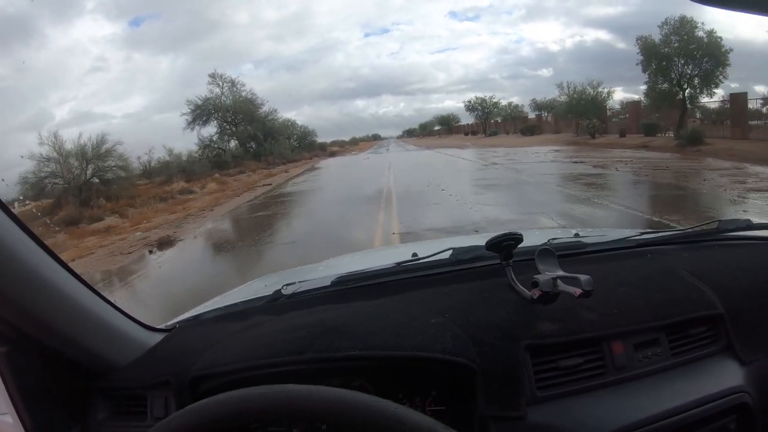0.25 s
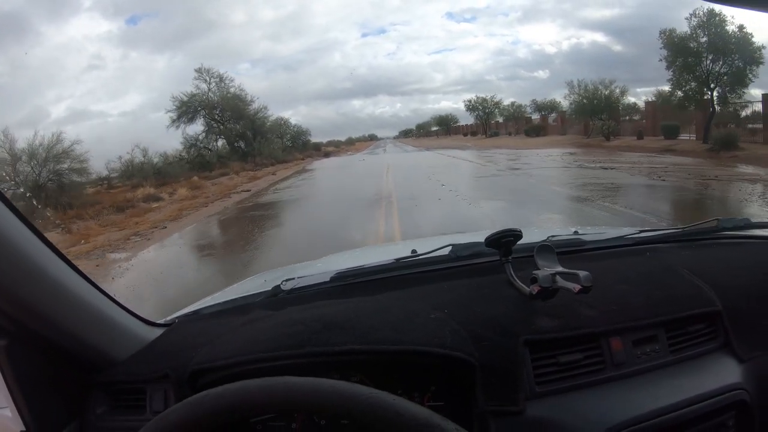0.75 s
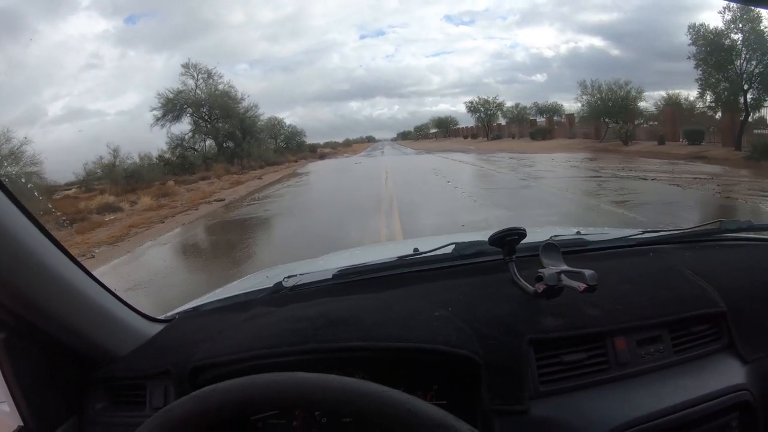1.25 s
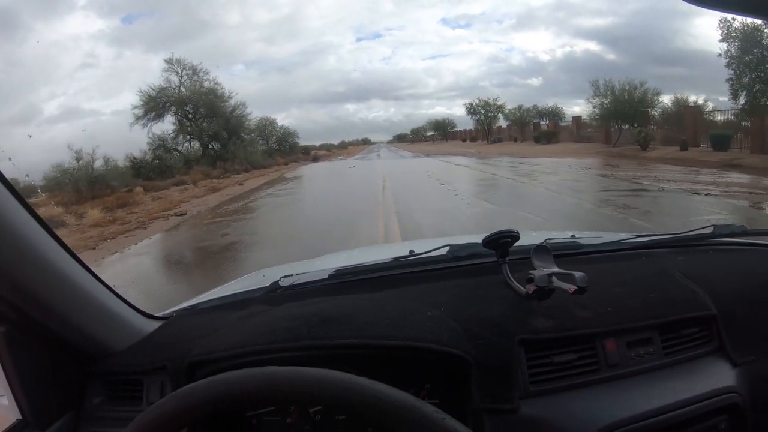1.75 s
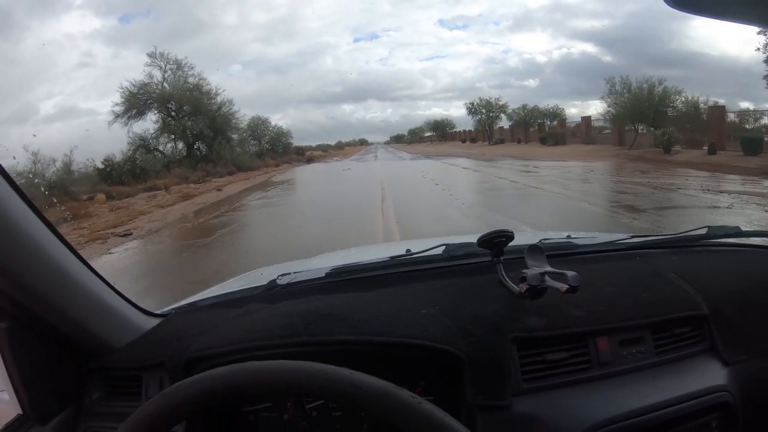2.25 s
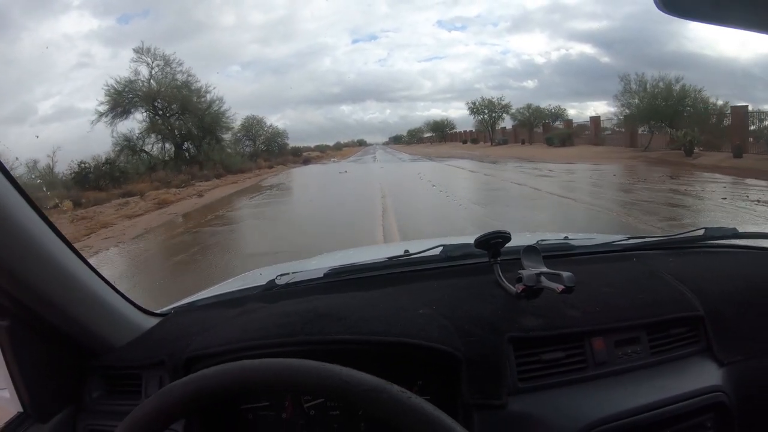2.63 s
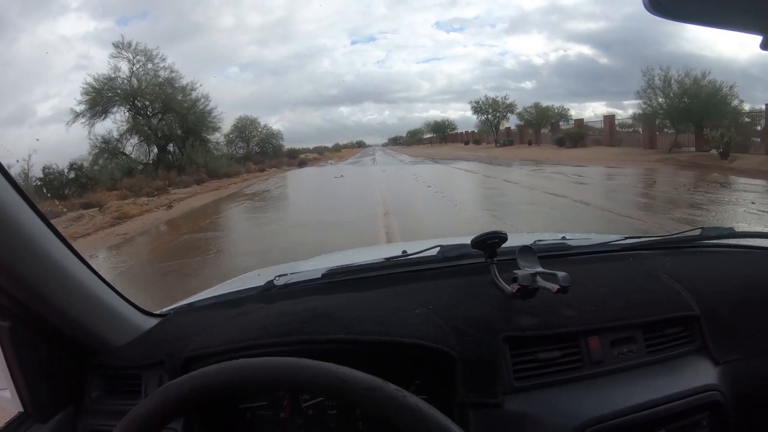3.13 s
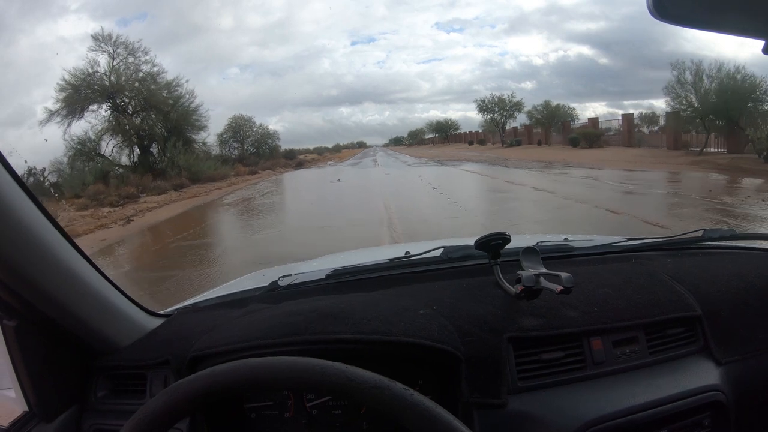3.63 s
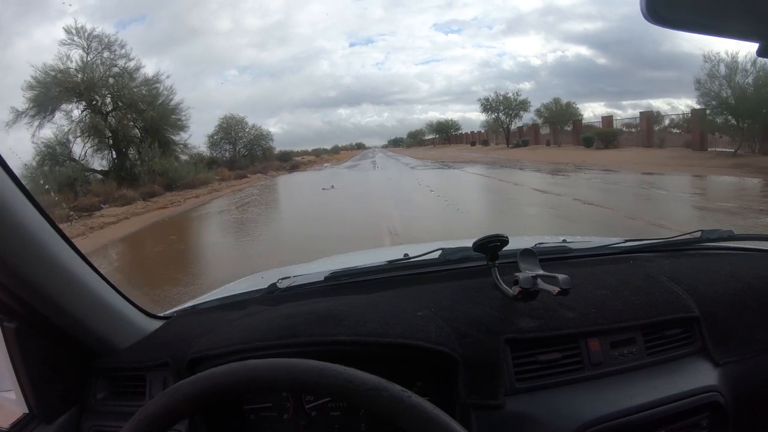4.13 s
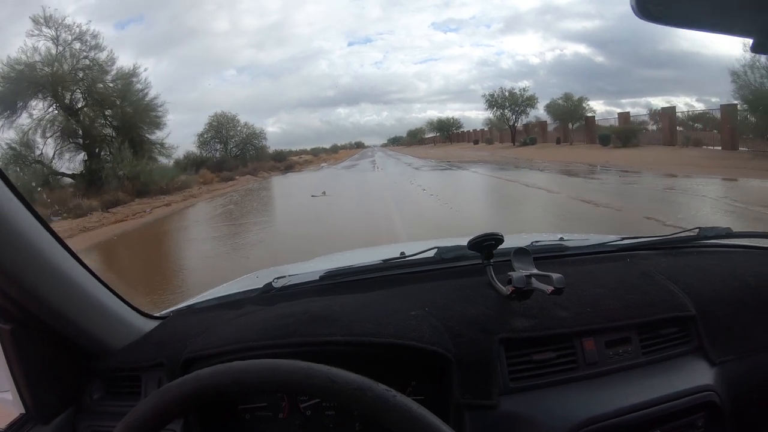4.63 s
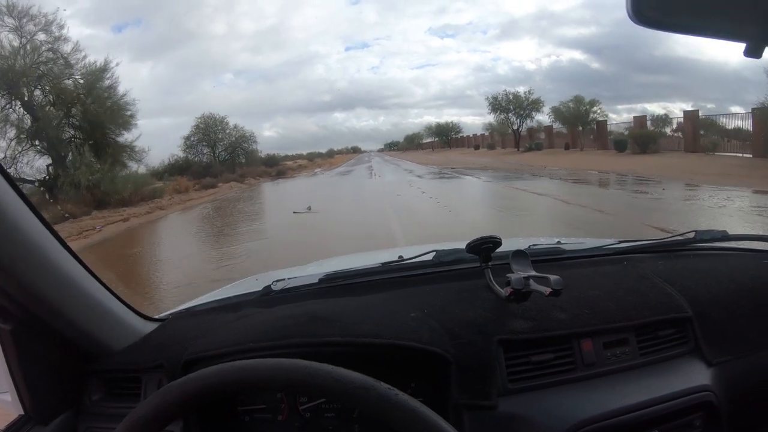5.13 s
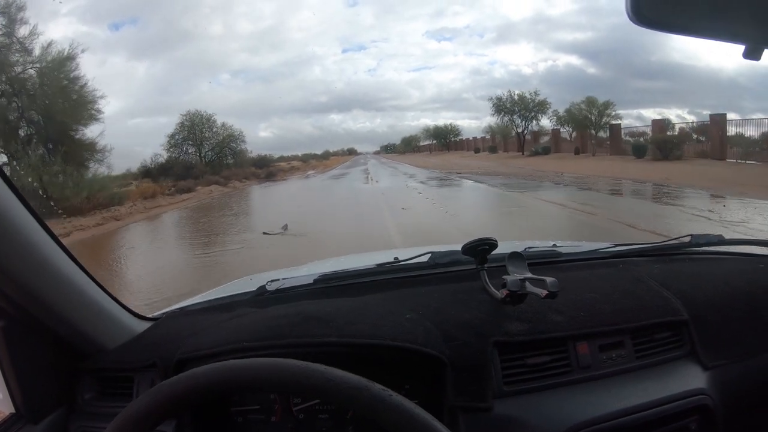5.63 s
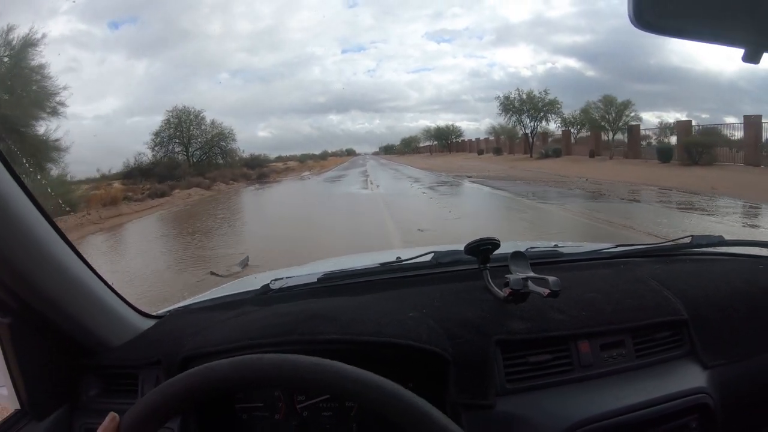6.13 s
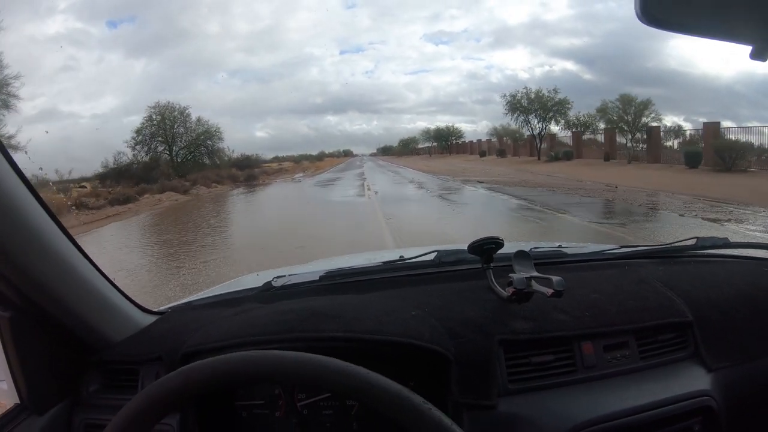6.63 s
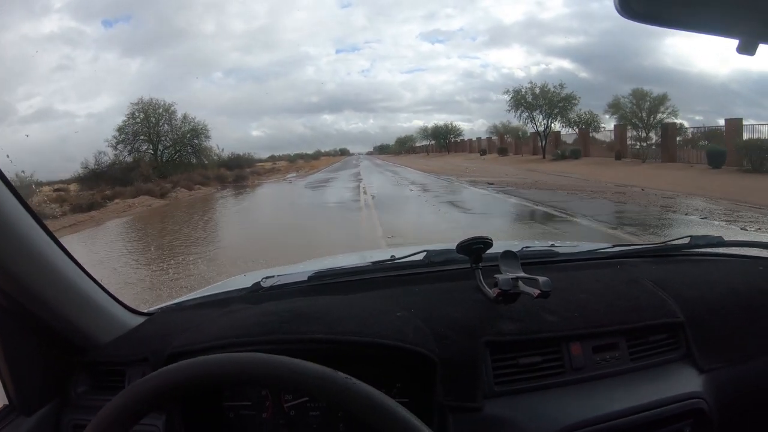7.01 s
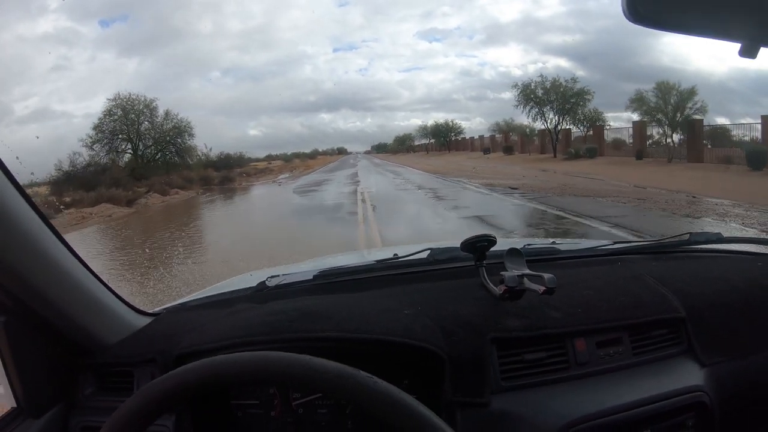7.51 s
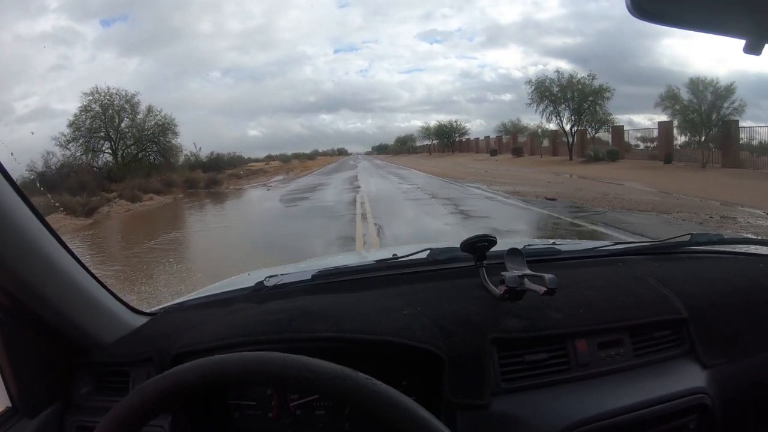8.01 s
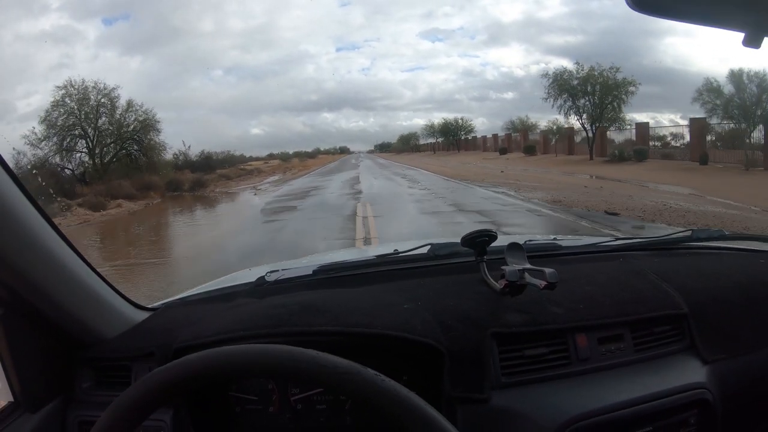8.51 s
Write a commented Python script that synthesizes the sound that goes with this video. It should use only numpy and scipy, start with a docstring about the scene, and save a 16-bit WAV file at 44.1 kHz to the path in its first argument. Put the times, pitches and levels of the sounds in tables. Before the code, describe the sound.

Heard inside a car cabin, a very low engine note and bassy road rumble dominate. Brakes rub faintly at first, and a soft double bump knocks the body. The engine pitch then rises as the car pulls on. Wet tyre hiss gradually builds into patchy spray, with water slapping the wheel arches and drops ticking on bodywork. Stereo microphone in the cabin, bass nearly centred, water wider.

```python
"""An engine's firing note booms in the cabin as a car rolls slowly into water lying over a road.
The note is a sine with a weak overtone, following a table of rate and level; a driveline hum joins it.
Road noise shakes the cabin's low modes, and the brakes rub at first as noise through narrow resonances.
Then wheel spray rises: patchy, grainy noise, with gouts slapping the arches and drops ticking as damped notes.
Two microphone ports hear it all through a frequency-dependent stereo mix."""
import sys
import numpy as np
from scipy import signal
from scipy.fft import rfft, irfft, next_fast_len
from scipy.io import wavfile
from scipy.ndimage import uniform_filter1d, minimum_filter1d, map_coordinates

SR = 44100
rng = np.random.default_rng(int(sys.argv[2]) if len(sys.argv) > 2 else 0)


def pcm_store(signal):
    """Save signal as 16-bit PCM."""
    levels = np.round(np.clip(np.atleast_2d(signal), -1, 1) * 32767)
    wavfile.write(sys.argv[1], SR, levels.astype(np.int16).T)


N = 385875


def amp(db):
    """Decibels to amplitude."""
    return 10 ** (np.asarray(db) / 20)


def unit(x):
    """Scale to rms 1."""
    return x / np.sqrt(np.mean(x ** 2) + 1e-20)


def along(points, hz):
    """(Hz, value) points interpolated on a log frequency axis."""
    point_hz, value = np.transpose(points)
    return np.interp(np.log(hz + 1), np.log(point_hz + 1), value)


def curves(rows):
    """One value per sample for each column after the time."""
    time_s, *columns = np.transpose(rows)
    return [np.interp(np.arange(N) / SR, time_s, column) for column in columns]


def wobble(knots_per_s):
    """Smooth random curve: cubic spline through normal knots."""
    at = np.arange(0, N + 64, 64)
    knots = rng.standard_normal(int(N * knots_per_s / SR) + 4)
    return np.interp(np.arange(N), at, map_coordinates(knots, [at * knots_per_s / SR]))


def filtered(x, response):
    """x times a complex response of frequency."""
    size = next_fast_len(N + SR // 2)
    return irfft(rfft(x, size) * response(np.fft.rfftfreq(size, 1 / SR)), size)[..., :N]


def ringing(modes):
    """Two unrelated noises through the same resonances, rms 1."""
    def response(f):
        power = 0
        for hz, width_hz, db in modes:
            detune = (f * f - hz * hz) / (f * width_hz + 1e-9)
            power = power + amp(2 * db) / (1 + detune ** 2) ** 2
        return np.sqrt(power)
    return unit(filtered(rng.standard_normal((2, N)), response))


def humming(modes, waver_db, base_hz=0):
    """Modes sounding without pause, pitch and strength drifting a little; rms 1."""
    total = np.zeros(N)
    for hz, wander_hz, db in modes:
        phase = 2 * np.pi * np.cumsum(base_hz + hz + wander_hz * wobble(10)) / SR
        total += amp(db + waver_db * wobble(7)) * np.sin(phase + rng.uniform(0, 2 * np.pi))
    return unit(total)


def rush(spectrum, patchy_db, grains=0):
    """Two unrelated noises sharing time-frequency patches of random gain, over optional grains; rms 1."""
    z = signal.stft(rng.standard_normal((2, N)), nperseg=256)[2]
    patches = rng.standard_normal(z.shape[1:])
    patches = uniform_filter1d(patches, size=6, axis=0)  # bins
    patches = uniform_filter1d(patches, size=7, axis=1)  # frames
    pair = signal.istft(z * amp(patchy_db * unit(patches)), nperseg=256)[1][:, :N]
    return unit(filtered(unit(pair) + grains, lambda hz: amp(along(spectrum, hz))))


def patter(rate_per_s, spread_db):
    """Droplets as random impulses of very uneven size, rms 1."""
    hit = rng.random((2, N)) < rate_per_s / SR
    size_db = spread_db * np.minimum(rng.exponential(size=(2, N)), 4)
    return unit(hit * rng.choice([-1, 1], (2, N)) * amp(size_db))


def ring(t, hz, t60_s, rise_s):
    """Damped sine with a soft start."""
    return amp(-60 * t / t60_s) * (1 - np.exp(-t / rise_s)) * np.sin(2 * np.pi * hz * t)


# road coarseness: (time [s], rumble level [dB], body shell level [dB])
COARSE = [(0, -26, -37.5), (.7, -29, -37.5), (1.2, -22.5, -37.5), (1.7, -28.5, -39), (2.7, -26.5, -38.5),
          (3.5, -31.5, -38.5), (4.5, -30, -38), (5.4, -30.5, -39), (6.2, -26.5, -37.5), (7, -27.5, -38),
          (8.3, -27, -37.5), (8.55, -29, -39), (8.75, -33, -36.5)]
# noise spectra: (frequency [Hz], relative level [dB per Hz])
RUMBLE = [(8, -37), (16, -13), (22, -7), (30, -11), (40, 0), (62, -7), (85, -14.5), (100, -14.5),
          (125, -15.5), (150, -17.5), (190, -30.5), (400, -120)]
BODY = [(88, -40), (150, 0), (161, -4), (199, -1), (237, -3.5), (289, -8.5), (307, -11.5), (340, -15),
        (372, -15), (455, -20), (700, -28), (910, -70), (1540, -120)]
# cabin air modes: (frequency [Hz], wander [Hz], relative level [dB])
BOOM = [(41, 2.27, -6), (50.6, 2.415, 0), (59.53, 2.4, -8), (72.23, 2.406, -6), (80.63, 2.386, -9.5)]
# floor pan modes: (frequency above the lowest [Hz], wander [Hz], relative level [dB])
DRONE = [(0, 1.2, -0.5), (8, 2.2, -5), (17, 2.2, -6)]
# lowest floor pan mode, shifting with the load on it: (time [s], pitch [Hz])
PAN = [(0, 118), (.9, 121), (1.9, 119), (2.2, 112.5), (2.7, 115), (3.2, 118), (3.8, 116), (4.4, 120),
       (5.1, 113.5), (5.6, 119.5), (6.3, 116), (6.9, 113), (7.5, 118), (8.3, 123), (8.75, 120)]
# drone swells over ridges: (time of the top [s], gain [dB])
SWELLS = [(0.549, 4.5), (2.3, 3), (3.198, 8), (3.78, 4), (4.03, 3.5), (4.43, 7.5), (5.6, 8), (6.0, 2.5),
          (6.58, 5.5), (6.97, 3), (7.99, 6)]
SWELL_SIGMA_S = 0.068
BOOM_OVER_RUMBLE_DB, DRONE_BASE_DB, DRONE_WAVER_DB = 3.5, -33, 1


def road():
    """Road texture shakes the cabin air, the floor pan and the body shell."""
    coarse_db, body_db = curves(COARSE)
    pan_hz, = curves(PAN)
    t = np.arange(N) / SR
    drone_db = DRONE_BASE_DB + DRONE_WAVER_DB * wobble(8)
    for top_s, gain_db in SWELLS:
        drone_db += gain_db * np.exp(-((t - top_s) / SWELL_SIGMA_S) ** 2 / 2)
    shake = amp(coarse_db) * rush(RUMBLE, patchy_db=0.05)
    shake += amp(body_db + 0.91 * wobble(7)) * rush(BODY, patchy_db=0.2)
    boom_db = coarse_db + BOOM_OVER_RUMBLE_DB + 0.73 * wobble(5.1)
    shake[0] += amp(boom_db) * humming(BOOM, waver_db=3)
    shake[0] += amp(drone_db) * humming(DRONE, waver_db=2.6, base_hz=pan_hz)
    return shake


# pads rubbing: (time [s], low ring level [dB], high ring level [dB], scrape level [dB])
BRAKES = [(.15, -83, -76, -80), (.35, -56, -63, -63), (.7, -56, -59, -64), (.9, -53, -58, -56.5),
          (1.2, -54, -59, -63), (1.6, -56, -63, -67), (1.85, -55, -60, -67), (2.02, -51.5, -60, -62),
          (2.15, -52, -58, -61), (2.25, -58, -54, -62), (2.55, -54, -57, -65), (2.9, -59, -56.5, -64),
          (3.3, -59, -58.5, -66), (3.45, -55, -57, -64), (3.65, -70, -82, -58), (3.9, -81, -88, -65.5)]
# resonances: (frequency [Hz], width [Hz], relative level [dB])
LOW_RING = [(1390, 120, -2), (1513, 180, -5), (1895, 130, 0), (2040, 200, -8)]
HIGH_RING = [(2675, 120, 0), (2790, 120, -1), (4250, 250, -13)]
SCRAPE = [(3080, 320, 0), (3450, 250, -6)]


def brakes():
    """Pads drag unevenly on wet discs and excite their rings and a broader scrape, each in its own fits."""
    drag_db = 1.3 * wobble(18)
    rub = np.zeros((2, N))
    for level_db, modes in zip(curves(BRAKES), [LOW_RING, HIGH_RING, SCRAPE]):
        fits_db = drag_db + 1.2 * wobble(12)
        rub += amp(level_db + fits_db) * ringing(modes)
    return rub


# a wheel drops over a joint and rebounds: (time [s], level [dB])
BUMP = [(1.1626, -21), (1.176, -31)]
# shell modes: (frequency [Hz], relative level [dB], t60 [s])
KNOCK = [(195, 5, 0.17), (262, -3.5, 0.12), (330, -4, 0.085), (445, -15, 0.06), (550, -6.5, 0.055),
         (655, -4.5, 0.055), (875, -12.5, 0.033), (1870, -19, 0.11)]


def bump():
    """Each blow rings the body shell's damped modes."""
    out, t = np.zeros(N + SR), np.arange(SR // 4) / SR
    knock = sum(amp(db) * ring(t, hz, t60_s, rise_s=0.0022) for hz, db, t60_s in KNOCK)
    for time_s, level_db in BUMP:
        out[round(time_s * SR):][:len(t)] += amp(level_db) * knock
    return out[:N]


# tyre hiss on wet asphalt: (time [s], level [dB])
TYRES = [(0, -53), (.4, -52.5), (1.1, -50.5), (2.02, -50), (2.36, -51.5), (3.75, -49), (5.97, -48.5),
         (6.16, -46), (7.5, -43.5), (8.75, -49)]
# slosh in the arches: (time [s], level [dB])
SLOSHING = [(0.0, -45), (0.02, -59.5), (0.36, -55), (0.88, -54), (0.92, -52), (1.34, -56), (1.95, -56.5),
            (2.26, -52), (2.61, -52.5), (3.78, -53), (4.0, -55.5), (4.36, -52.5), (4.41, -54),
            (4.53, -48.5), (4.8, -51.5), (4.9, -46.5), (4.95, -51.5), (5.09, -45), (5.46, -47.5),
            (5.97, -43.5), (6.09, -41), (6.38, -42), (7.41, -40.5), (7.8, -41), (7.82, -38.5),
            (8.75, -43.5)]
# spray thrown up by the wheels: (time [s], level [dB])
WATER = [(0, -68.5), (.3, -69), (1.0, -63), (1.41, -65), (1.9, -66.5), (2.39, -64), (3.46, -64),
         (3.65, -59.5), (3.95, -63), (4.29, -61), (4.63, -56.5), (4.95, -56.5), (5.21, -52), (5.65, -54),
         (6.16, -48.5), (6.43, -49.5), (7.6, -46), (8.75, -48)]
# noise spectra: (frequency [Hz], relative level [dB per Hz])
HISS = [(260, -14.5), (450, -4), (526, -4.5), (566, -12.5), (823, -1), (1370, -4.5), (2070, -10.5),
        (2170, -8.5), (2930, -16.5), (3180, -13.5), (4000, -37), (5200, -48), (8800, -120)]
SLOSH = [(710, -10), (1200, -7), (1290, -15), (1480, -4), (1800, -5.5), (2400, 0), (3770, -1), (4950, -4.5),
         (5860, -9), (7000, -23.5), (9100, -30), (15400, -120)]
SPRAY = [(2940, -22), (5000, -6), (5870, -2), (7090, -5), (9280, -3.5), (11200, -14), (12600, -16),
         (14600, -26.5), (15400, -30)]


def water():
    """Tyre hiss, arch slosh and fine spray share surges; slosh and spray also share droplets."""
    (hiss_db,), (slosh_db,), (spray_db,) = curves(TYRES), curves(SLOSHING), curves(WATER)
    surge, droplets = wobble(24), patter(900, spread_db=2.5)
    hiss_grains = 0.3 * patter(400, spread_db=4.5)
    hiss = amp(hiss_db + 0.34 * surge) * rush(HISS, patchy_db=1.47, grains=hiss_grains)
    slosh = amp(slosh_db + 0.59 * surge) * rush(SLOSH, patchy_db=1.57, grains=0.37 * droplets)
    spray_db = spray_db + 0.66 * surge + 0.37 * wobble(30)
    spray = amp(spray_db) * rush(SPRAY, patchy_db=0.7, grains=0.4 * droplets)
    return hiss + slosh + spray


# strongest gouts slapping the arches: (time [s], puff level [dB], low splat level [dB])
SPLASHES = [(4.63, -44, -62), (4.77, -60, -49), (5.101, -44, -47), (5.145, -41.5, -60), (5.32, -56, -46),
            (5.6367, -44, -60), (6.1905, -42, -46), (6.642, -53, -46), (6.905, -53, -39), (6.98, -48, -55),
            (7.085, -41, -58), (7.62, -57, -39), (7.8672, -47, -46), (8.305, -52, -45), (8.3725, -43, -57),
            (8.478, -55, -49), (8.5342, -44, -57), (8.587, -45, -52)]
# splat spectrum: (frequency [Hz], relative level [dB per Hz])
SPLAT = [(400, -40), (700, -9), (900, 4), (1500, -4), (1900, -12), (3000, -54)]
SMALL_PER_S, SMALL_OVER_SPRAY_DB, SMALL_SCATTER_DB = 5.6, 5.5, -3.5  # lesser gouts
DULL_DB = 3.5  # slosh part of a puff against its spray part


def splashes():
    """Strong gouts puff spray and slosh over a low splat; lesser ones puff at random."""
    t = np.arange(SR // 4) / SR
    puff = amp(-60 * t / 0.067) * (1 - np.exp(-t / 0.006))
    thud = amp(-60 * t / 0.17) * (1 - np.exp(-t / 0.0053))
    small_db = curves(WATER)[0] + SMALL_OVER_SPRAY_DB + SMALL_SCATTER_DB * rng.standard_normal(N)
    gouts = (rng.random(N) < SMALL_PER_S / SR) * amp(small_db)
    splats = np.zeros(N)
    for time_s, puff_db, splat_db in SPLASHES:
        gouts[round(time_s * SR)] = amp(puff_db)
        splats[round(time_s * SR)] = amp(splat_db)
    puff_noise = rush(SPRAY, patchy_db=2.5) + amp(DULL_DB) * rush(SLOSH, patchy_db=5.0)
    puffs = signal.fftconvolve(gouts, puff)[:N] * puff_noise
    return puffs + signal.fftconvolve(splats, thud)[:N] * rush(SPLAT, patchy_db=-0.5)


# single drops on the bodywork: (time [s], level [dB], pitch [Hz])
DROPS = [(1.3618, -39.5, 2060), (1.969, -32, 9120), (1.9691, -42, 11000), (2.0153, -40, 9135),
         (2.486, -30, 2710), (2.648, -32, 2680), (3.0582, -32, 2624), (4.2761, -29, 3375),
         (4.4775, -27, 5420), (4.5105, -32, 3004), (4.5411, -24, 2837), (4.6105, -23, 5014),
         (5.2598, -35, 9000), (5.3775, -31, 9150), (6.7945, -18, 4040), (6.871, -25, 9120),
         (6.938, -27, 3696), (6.9841, -25, 2790), (6.986, -24, 3750), (7.094, -28, 3350),
         (6.1895, -30, 3950), (8.722, -26, 2080)]
DROP_T60_CYCLES, DROP_RISE_CYCLES = 25, 1.24
FLECKS_PER_S, FLECK_HZ, FLECK_SPREAD_OCTAVES = 110, 2974, 0.652  # lesser drops
FLECK_DB, FLECK_DB_PER_SPRAY_DB, FLECK_SCATTER_DB = -43, 0.51, 4  # FLECK_DB: at the mean of the spray table


def drops():
    """Drops tick as short damped notes, the higher the shorter; lesser ones follow the spray level."""
    out, t = np.zeros(N + SR), np.arange(SR // 4) / SR
    gaps, pitch, size = rng.standard_normal((N // 200, 3)).T
    when_s = np.cumsum(np.abs(gaps) * np.sqrt(np.pi / 2)) / FLECKS_PER_S  # mean gap 1 / rate
    spray_s, spray_db = np.transpose(WATER)
    over_mean_db = np.interp(when_s, spray_s, spray_db) - spray_db.mean()
    fleck_db = FLECK_DB + FLECK_DB_PER_SPRAY_DB * over_mean_db + FLECK_SCATTER_DB * size
    fleck_hz = FLECK_HZ * 2 ** (FLECK_SPREAD_OCTAVES * np.clip(pitch, -1, 2))
    flecks = np.transpose([when_s, fleck_db, fleck_hz])[when_s < N / SR]
    for time_s, db, hz in [*DROPS, *flecks]:
        life = t[:int(DROP_T60_CYCLES / hz * SR)]
        tick = amp(db) * ring(life, hz, DROP_T60_CYCLES / hz, DROP_RISE_CYCLES / hz)
        out[round(time_s * SR):][:len(life)] += tick
    return out[:N]


# engine: (time [s], firing rate [Hz], level [dB])
ENGINE = [(0, 26.76, -26), (.6, 27.02, -26.5), (1.0, 27.16, -25.5), (1.4, 27.25, -26.5),
          (2.05, 27.27, -25.5), (2.46, 32.2, -22), (2.8, 35.07, -20.5), (3.3, 35.38, -21),
          (4.82, 36.14, -19.5), (5.4, 36.89, -16.5), (5.7, 37.23, -19), (6.8, 39.01, -18.5),
          (7.24, 41.47, -26), (7.4, 42.47, -17.5), (7.75, 43.92, -21.5), (7.97, 44.59, -24),
          (8.1, 46.14, -18), (8.46, 51.95, -17), (8.6, 53, -21.5), (8.75, 54.2, -28.5)]
# overtones: (multiple of the firing rate, relative level [dB])
ORDERS = [(1, 0), (2, -23.5)]
# driveline hum under load: (time [s], pitch [Hz], level [dB])
HUM = [(5.6, 153.8, -66), (5.9, 154.7, -36.5), (6.57, 159.1, -38.5), (7.34, 159, -35.5), (7.7, 155.6, -46),
       (7.9, 153, -60)]


def engine():
    """The firing note with a weak overtone, slightly uneven, and the driveline hum."""
    firing_hz, firing_db = curves(ENGINE)
    turn = 2 * np.pi * np.cumsum(firing_hz * (1 + 0.0059 * wobble(5))) / SR
    note = np.zeros(N)
    for order, db in ORDERS:
        note += amp(db + 1.0 * wobble(9)) * np.sin(order * turn + rng.uniform(0, 2 * np.pi))
    hum_hz, hum_db = curves(HUM)
    hum = amp(hum_db + 0.5 * wobble(7.4)) * np.sin(2 * np.pi * np.cumsum(hum_hz) / SR)
    return np.sqrt(2) * (amp(firing_db) * note + hum)  # levels are rms


# (frequency [Hz], unrelated against shared part [dB], held to 0 at most)
APART = [(40, -24), (70, -27), (125, -35), (180, -35), (270, -28.5), (450, -12), (600, -12.5), (740, -12),
         (1220, -9), (2010, -3.5), (2700, -8), (3600, -11.5), (5500, -2), (9080, -2.5), (15000, 0.5)]
# (frequency [Hz], left minus right [dB])
BASS_LEAN = [(40, -.55), (60, -.4), (125, 0)]
LEAN = [(270, 0), (450, 1), (740, 2), (1220, 1), (2010, 3.5), (2740, 5.5), (3500, 2), (4190, 0.5),
        (5500, -12), (6410, -6.5), (9080, -5.5), (15000, 5.5)]
# (frequency [Hz], phase by which left leads [rad])
LEAD = [(300, 0), (950, -0.63), (2240, 0.59), (3190, 0.45), (4570, 0.5), (5680, 3.5), (7060, 3.5),
        (9560, 6.5), (15200, 3.5)]


def ports(hz):
    """Mix two unrelated parts into left and right: likeness, level and phase by frequency."""
    angle = np.arctan(amp(np.minimum(along(APART, hz), 0)))
    shared, apart = np.cos(angle), np.sin(angle)
    half = amp(along([*BASS_LEAN, *LEAN], hz) / 2) * np.exp(.5j * along(LEAD, hz))
    return np.array([[shared * half, apart * half], [shared / half, -apart / half]])


FADE_S = .008


def scene():
    """Diffuse sounds reach the ports in two unrelated parts, compact ones in one; the ends are faded."""
    parts = road() + brakes() + water() + splashes()
    parts[0] += bump() + drops() + engine()
    to_end = np.minimum(np.arange(N), np.arange(N)[::-1])
    parts *= np.minimum(1, to_end / (FADE_S * SR))
    return filtered(parts, ports).sum(axis=1)


LIMIT, TOP_HZ = 0.35, 15600  # limiter threshold (linear amplitude); band limit


def record(dry):
    """A limiter with one gain for both channels holds peaks down; a low-pass cuts above the band limit."""
    need = np.minimum(1, LIMIT / (np.abs(dry).max(axis=0) + 1e-9))
    gain = uniform_filter1d(minimum_filter1d(need, size=1401), size=700)  # samples
    return filtered(dry * gain, lambda hz: hz < TOP_HZ)


dry = scene()
out = record(dry)
pcm_store(out)
```